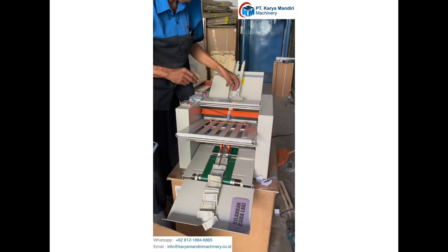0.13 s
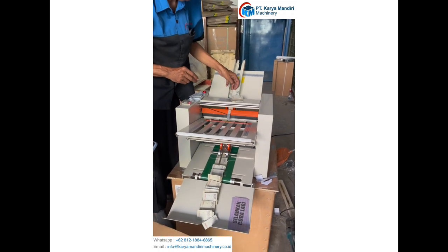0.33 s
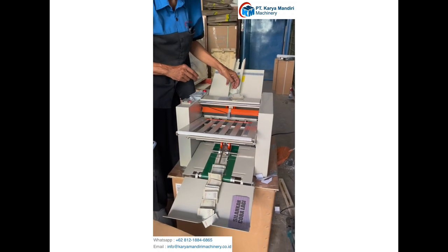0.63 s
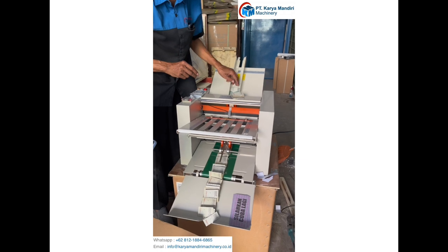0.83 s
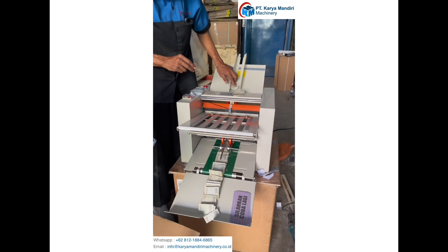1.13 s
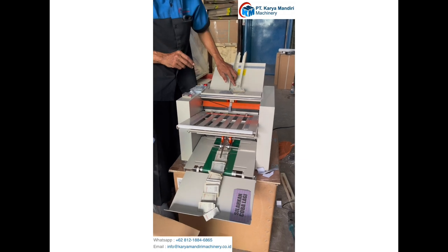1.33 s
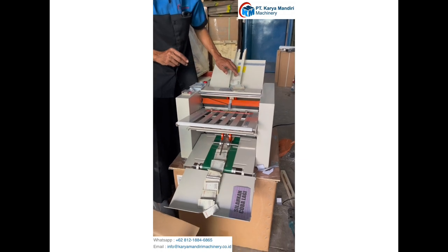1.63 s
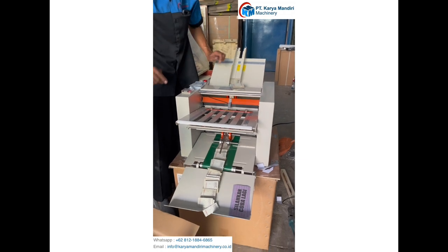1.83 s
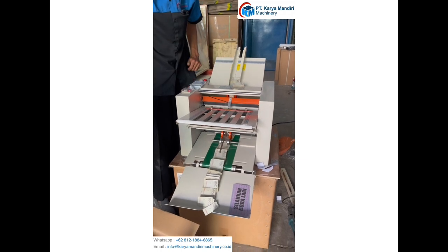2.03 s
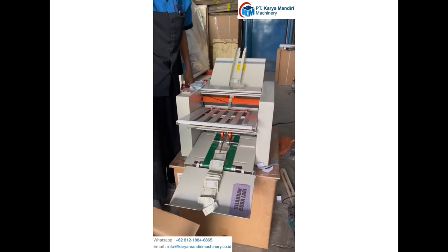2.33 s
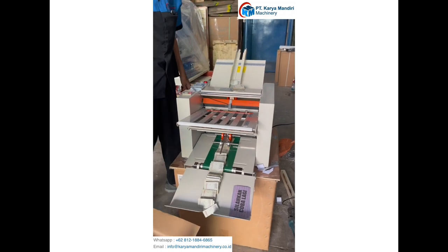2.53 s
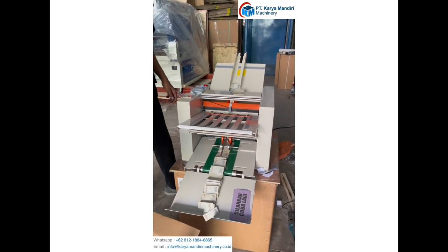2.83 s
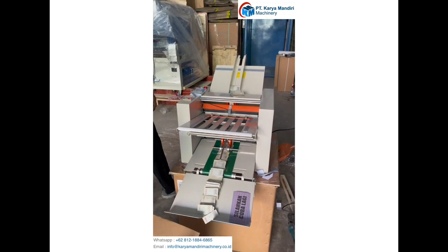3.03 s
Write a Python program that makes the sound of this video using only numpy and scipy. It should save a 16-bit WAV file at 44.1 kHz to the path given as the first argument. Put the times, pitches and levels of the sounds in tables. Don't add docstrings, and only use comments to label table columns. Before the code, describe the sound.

A tabletop paper folding machine whirs steadily while sheets snap, rustle and drop onto its tray.

```python
import sys
import numpy as np
from scipy import signal
from scipy.fft import rfft, irfft, next_fast_len
from scipy.io import wavfile
from scipy.ndimage import uniform_filter1d, map_coordinates

SR = 44100
rng = np.random.default_rng(int(sys.argv[2]) if len(sys.argv) > 2 else 0)


def transcribe(signal):
    frames = np.atleast_2d(signal).T
    limited = np.clip(frames, -1, 1)
    pcm = np.round(limited * 32767).astype(np.int16)
    wavfile.write(sys.argv[1], SR, pcm)


def how_loud(loudness_db):
    steps = np.asarray(loudness_db, float) / 20
    return 10 ** steps


N = 139797


def in_hz(points, hz):
    f, v = np.transpose(points)
    return np.interp(np.log(hz + 1), np.log(f + 1), v)


def colour(x, points):
    gain = how_loud(in_hz(points, np.fft.rfftfreq(N, 1 / SR)))
    y = irfft(rfft(x) * gain, N)
    return y / np.std(y)


def butter(x, order, hz, kind="low"):
    return signal.sosfilt(signal.butter(order, hz, kind, fs=SR, output="sos"), x)


def drift(rate_hz):
    knots = rng.standard_normal(400)
    return map_coordinates(knots, [np.arange(N) / SR * rate_hz], order=3)


def grains(per_s, spread_db):
    hits = rng.random(N) < per_s / SR
    size = how_loud(spread_db * np.minimum(rng.exponential(1, N), 4))
    return hits * size * rng.choice([-1, 1], N)


def ring(x, hz, t60_s):
    r, w = how_loud(-60 / (t60_s * SR)), 2 * np.pi * hz / SR
    return signal.lfilter([0, np.sin(w)], [1, -2 * r * np.cos(w), r * r], x)


# [t/s, angle/turns]
ROLLER_TURNS = [(-.0129, -.5), (.7756, 3.5), (2.367, 11.5), (3.265, 16)]
TURN_S = .1971


def turns():
    return np.interp(np.arange(N) / SR, *np.transpose(ROLLER_TURNS))


# [mesh f/Hz, level/dB, throb/dB, throb phase/rad]
GEAR_TONES = [(60.6, -11.5, 2, 5), (82.2, -7, 4.5, -2.5), (131.3, -9.5, 4.5, 3.26), (199.6, -12, -9, 9.5),
              (227.7, -6, 0.5, 0.7), (262.6, -4, 6.5, -1.84), (266.9, -3, 6.5, 0.5), (295.2, -5.5, 2, 0),
              (437, -13, -1, -0.5), (510.3, -10.5, 1, -9), (690, -21.5, 13, -2), (1602, -22.5, -4.5, 0.4)]
# [f/Hz, density/dB per Hz]
CASING_COLOUR = [(32, -28), (62, -4), (100, -7), (165, -9.5), (270, -5), (400, -15.5), (650, -18.5),
                 (1100, -31.5), (2600, -48.5)]


def drive():
    wobble_rad, wander_db = 1.0, 2.5
    rumble_db, repeat_share = 1.5, 0.91
    roll = turns()
    angle = 2 * np.pi * roll
    tones = np.zeros(N)
    for hz, db, throb_db, lag in GEAR_TONES:
        level = how_loud(db + throb_db * np.cos(angle - lag) + wander_db * drift(6.58))
        start = rng.uniform(0, 2 * np.pi)
        wobble = wobble_rad * np.clip(hz / 262, .8, 1.6) * drift(9)
        tones += level * np.sin(hz * TURN_S * angle + start + wobble)
    turn_n = int(TURN_S * SR)
    looped = rng.standard_normal(turn_n)[(roll % 1 * turn_n).astype(int)]
    fresh = rng.standard_normal(N)
    rumble = np.sqrt(repeat_share) * looped + np.sqrt(1 - repeat_share) * fresh
    return tones + how_loud(rumble_db) * colour(rumble, CASING_COLOUR)


# [f/Hz, density/dB per Hz]
HISS_COLOUR = [(500, 0.5), (1500, 1), (3500, -5), (5000, -9), (8000, -12.5), (10500, -0.5), (11800, -12),
               (13000, -33.5)]


def rollers():
    hiss_db, throb_db, rise = -7, 6.5, .1
    phase = (2 * turns() + rise / 2) % 1
    saw = np.interp(phase, [0, rise, .35, .6, 1], [0, 0.87, 0.48, 0.0, 0.063])
    grit = grains(2500, spread_db=2.0) + 0.62 * rng.standard_normal(N)
    return how_loud(hiss_db + throb_db * saw + 0.99 * drift(24.31)) * colour(grit, HISS_COLOUR)


# [t/s, level/dB]
MOTOR_LEVEL = [(0, -26.5), (.5, -27), (.85, -26.5), (1.15, -26.5), (1.3, -29.5), (1.35, -35.5),
               (1.46, -31.5), (1.55, -25.5), (1.7, -28.5), (1.8, -28.5), (1.95, -26), (2.2, -27),
               (2.35, -27.5), (2.45, -27.5), (2.75, -25), (2.88, -27.5), (3.17, -27)]


def machine():
    level = how_loud(np.interp(np.arange(N) / SR, *np.transpose(MOTOR_LEVEL)))
    return level * (drive() * how_loud(-3.5) + rollers() * how_loud(-5))


# [t/s, level/dB]
TRAY_THUDS = [
    (.98, -35),
    (1.719, -15.5),
    (2.17, -18.5),
    (2.78, -14),
]


def tray():
    push = np.zeros(N) + 1e-18
    for s, db in TRAY_THUDS:
        push[int(s * SR)] = how_loud(db)
    push = uniform_filter1d(uniform_filter1d(push, size=200), size=200)
    return ring(push, hz=83, t60_s=0.32)


# [t/s, level/dB]
FEED_GRIPS = [
    (.872, -52),
    (1.208, -41),
    (1.61, -52),
    (1.985, -48),
    (2.618, -48),
    (2.77, -54),
]


def swish():
    width_s = 0.011
    t = np.arange(N) / SR
    air = butter(rng.standard_normal((2, N)), 4, 8500, "high")
    air = butter(air, 3, 12500)
    return air * sum(how_loud(db) * np.exp(-((t - s) / width_s) ** 2) for s, db in FEED_GRIPS)


# [t/s, rise/s, fall t60/s, level/dB, treble tilt/dB]
RUSTLE_BURSTS = [(0.863, 0.032, 5.1, -32.5, -3), (1.001, 0.016, 0.24, -42, 10.5),
                 (1.19, 0.0075, 0.26, -30.5, -9), (1.268, 0.005, 0.34, -33.5, 7),
                 (1.325, 0.028, 0.66, -34.5, -4), (1.59, 0.013, 1.3, -37, -5),
                 (1.678, 0.0043, 0.51, -24, -1.5), (1.739, 0.0089, 0.19, -20.5, -4),
                 (1.97, 0.033, 0.85, -31, -3), (2.086, 0.0033, 0.22, -27.5, -1),
                 (2.136, 0.0042, 0.26, -28, 2), (2.599, 0.0096, 5.1, -37, -3),
                 (2.758, 0.03, 0.14, -27, 0.5)]
# [f/Hz, density/dB per Hz]
PAPER_COLOUR = [(500, -0.5), (1300, -10.5), (2400, 1), (3500, -5.5), (5600, -3), (8000, -6), (11000, 1.5),
                (14000, -52)]


def rustle():
    crackles_per_s, clump_db, spread_db, smooth = 1200, 2.5, 4.5, 1.2
    t = np.arange(N) / SR
    crackles = grains(crackles_per_s * how_loud(clump_db * drift(40)), spread_db)
    paper = colour(crackles + smooth * rng.standard_normal(N), PAPER_COLOUR) * how_loud(1.95 * drift(70))
    dull = butter(paper, 2, 4500)
    bright = paper - dull
    out = np.zeros(N)
    for s, rise_s, t60_s, db, tilt_db in RUSTLE_BURSTS:
        fall_db = -60 * np.maximum(t - s - rise_s, 0) / t60_s
        shape = np.clip((t - s) / rise_s, 0, 1) * how_loud(db + fall_db)
        out += shape * (dull + how_loud(tilt_db) * bright)
    return out


# [t/s, peak/dB, ring f/Hz, plate body/dB, treble/dB]
EDGE_STRIKES = [(.8706, -21.5, 2280, 8, 13.5), (.9021, -19, 2220, -5, 0), (.9857, -9.5, 4250, -0.5, 6.5),
                (1.0166, -24, 4180, -3, 13), (1.024, -21, 3950, -9, 7), (1.0575, -23.5, 2630, -1, 7),
                (1.1039, -26.5, 3150, 9.5, 12), (1.1964, -10, 5530, -1.5, 4),
                (1.2328, -20.5, 1560, 11.5, 10.5), (1.2733, -23, 2580, 6, 12),
                (1.3099, -10.5, 2740, 4, -6.5), (1.3414, -25, 2600, 12, 1), (1.6127, -20.5, 2090, 0, 3),
                (1.679, -22, 2200, -4, -4), (1.6905, -15, 5780, -12, 2), (1.6985, -6, 2434, 3.5, 0),
                (1.7195, -21, 3600, 1, 1), (1.7314, -15, 2520, 4, 2), (1.743, -8.5, 7070, -20, 0),
                (1.7455, -14.5, 2035, 6, 12), (1.7495, -23, 1950, -10, 11), (1.9788, -20, 1280, 5.5, 9),
                (1.9845, -19, 2400, 4, 9), (2.0213, -16.5, 4370, 5, -6), (2.0344, -17, 2210, -29, -2),
                (2.089, -11.5, 5700, -4, 1), (2.0931, -7, 2584, 1.5, 2.5), (2.1316, -17, 2470, 4, 8),
                (2.6102, -14, 5460, -0.5, 4), (2.6384, -26, 1810, 6, -3), (2.6551, -22.5, 3660, 0, 9),
                (2.7314, -5, 2457, 3.5, 0.5), (2.7644, -20, 2070, 3, -2), (2.7718, -23, 2160, -2, 2),
                (2.7843, -17.5, 1500, -8, 13.5)]
# [t/s, peak/dB, ring f/Hz]
EDGE_FLUTTER = [(0.879, -27, 2220), (0.887, -25, 2210), (0.909, -22, 2120), (0.924, -25.5, 2160),
                (0.939, -22, 2160), (0.963, -16, 5600), (1.1564, -25.5, 2140), (1.646, -23, 2100),
                (1.995, -20, 2190), (2.046, -20, 2110), (2.114, -18, 2110), (2.142, -27, 2220),
                (2.153, -21.5, 2130), (2.18, -25.5, 2220), (2.368, -29, 1630), (2.4703, -31, 2090),
                (2.6196, -21.5, 2210), (2.674, -23, 1960), (2.691, -25, 2520), (2.743, -18, 2440)]
# [f/Hz, level/dB, t60/s]
PLATE_MODES = [(2900, -5.5, 0.0054), (3610, -18, 0.021), (4270, -5, 0.0041), (5600, -2.5, 0.012),
               (7100, -16, 0.0096), (4700, -7, 0.0029), (10250, 5.5, 0.0098)]


def sheet_note(t, hz, hold_s):
    rise_s, release_t60_s, sag = .0005, .009, .07
    flap_ratio, flap_db, flap_late = .58, -11, .5
    quick = max(hz / 2800, 1) ** 1.5
    release_db = -60 * np.maximum(quick * t - hold_s, 0) / release_t60_s
    press = np.clip(t / rise_s, 0, 1) * how_loud(release_db)
    flap_shape = how_loud(flap_db) / quick * np.exp(-((t - hold_s) / (flap_late * hold_s)) ** 2)
    flap = flap_shape * np.sin(2 * np.pi * flap_ratio * hz * t)
    return press * np.sin(2 * np.pi * hz * t * (1 + sag - sag * t / hold_s / 2)) + flap


def plate_scrub(t, hold_s):
    spike, mode_spread_db = 2.5, 2
    mode_luck = rng.standard_normal(len(PLATE_MODES))
    contact = rng.standard_normal(len(t)) * np.exp(-(t / hold_s) ** 2)
    contact[2] += spike
    modes = [how_loud(db + mode_spread_db * luck) * ring(contact, hz, t60_s)
             for (hz, db, t60_s), luck in zip(PLATE_MODES, mode_luck)]
    crack = butter(contact, 2, (3600, 11300), "band")
    return [part / np.abs(part).max() for part in (sum(modes[:3]), sum(modes[3:]), crack)]


def ticks():
    tick_db, crack_db, flutter_dull_db = -3.5, 3, -3
    strikes = list(EDGE_STRIKES)
    strikes += [(s, db, hz, flutter_dull_db, flutter_dull_db) for s, db, hz in EDGE_FLUTTER]
    out, t = np.zeros(N + SR), np.arange(1500) / SR
    for s, db, hz, body_db, treble_db in strikes:
        hold_s = .0042 * how_loud(.3 * db)
        body, treble, crack = plate_scrub(t, hold_s)
        bright = (treble + how_loud(crack_db) * crack) / 2
        hit = sheet_note(t, hz, hold_s) + how_loud(body_db) * body + how_loud(treble_db) * bright
        i = int(s * SR)
        out[i:i + len(t)] += how_loud(db + tick_db) * hit
    return butter(out[:N], 2, 900, "high")


# [f/Hz, phase/rad]
PORT_LEAD = [(230, -.03), (600, -1.0), (1400, .15), (3400, .1), (4300, 1.1), (4850, 1.9), (5000, -1.7),
             (5700, -.38), (9300, 3.14), (11500, 5.0), (13000, 5.7)]
# [f/Hz, level/dB]
PORT_TILT = [(150, 0.3), (330, 0.2), (600, -1), (1200, -6), (2200, -1), (3900, -2.5), (7000, 0)]
# [f/Hz, level/dB]
ECHO_LEVEL = [(80, -45), (250, -15), (600, 0.5), (2000, -9.5), (3500, -0.5), (4600, -9), (6000, -7.5),
              (9000, -16.5), (12000, -35)]


def ports(x):
    shop_t60_s, top_hz, fall_db_per_khz = 0.12, 12000, 6
    size = next_fast_len(N + SR)
    hz, t = np.fft.rfftfreq(size, 1 / SR), np.arange(SR // 2) / SR
    side = np.array([[.5], [-.5]])
    tail = rng.standard_normal(len(t)) * how_loud(-60 * t / shop_t60_s) * (t > .002)
    tail = rfft(tail / np.sqrt(np.sum(tail ** 2)), size)
    gain_db = side * in_hz(PORT_TILT, hz) - fall_db_per_khz * np.maximum(hz - top_hz, 0) / 1000
    direct = how_loud(gain_db) * np.exp(1j * side * in_hz(PORT_LEAD, hz))
    echo = 2 * side * how_loud(in_hz(ECHO_LEVEL, hz)) * tail
    return irfft(rfft(x, size) * direct * (1 + echo), size)[:, :N]


def mute_weak(x, from_hz, limit_db):
    width_hz, quiet_db, follows, flicker_db, open_s = 430, -72.5, 0.55, 3.5, .02
    hz, at, z = signal.stft(x, SR, nperseg=2048, noverlap=1024)
    presence = z[(hz > 2000) & (hz < 6000)]
    loud = np.mean(np.abs(presence) ** 2, axis=0) / how_loud(2 * quiet_db)
    grip_s = np.array(FEED_GRIPS)[:, 0]
    busy = np.abs(at[:, None] - grip_s).min(axis=1) < open_s
    for low in np.arange(from_hz, SR / 2, width_hz):
        band = (hz >= low) & (hz < low + width_hz)
        power = np.mean(np.abs(z[band]) ** 2, axis=0)
        flicker = flicker_db * rng.standard_normal(len(loud))
        limit = how_loud(2 * limit_db + 2 * flicker) * loud ** follows
        z[band] *= busy + power > limit
    return signal.istft(z, SR, nperseg=2048, noverlap=1024)[1][:N]


def scene():
    return ports(machine() + rustle() + ticks() + tray()) + swish()


def low_pass(x):
    return signal.sosfilt(signal.butter(12, 15900, fs=SR, output="sos"), x)


def record(dry):
    left, right = butter(dry, 3, 40.7, "high")
    mid = mute_weak((left + right) / 2, from_hz=8200, limit_db=-80)
    side = mute_weak((left - right) / 2, from_hz=11600, limit_db=-67)
    return low_pass(np.array([mid + side, mid - side]))


dry = scene()
out = record(dry)
transcribe(out)
```